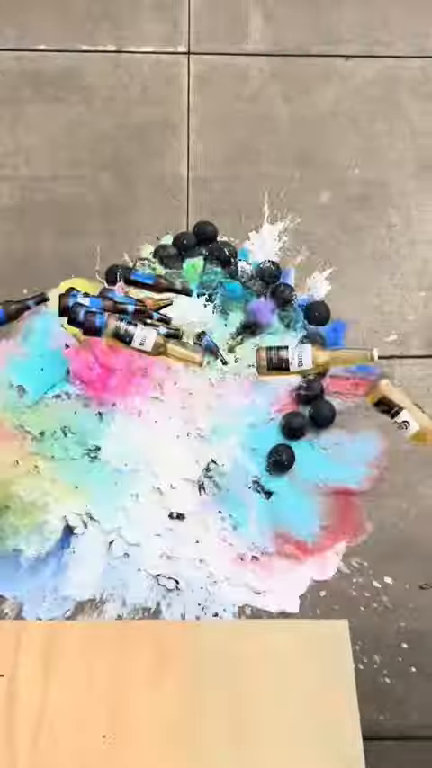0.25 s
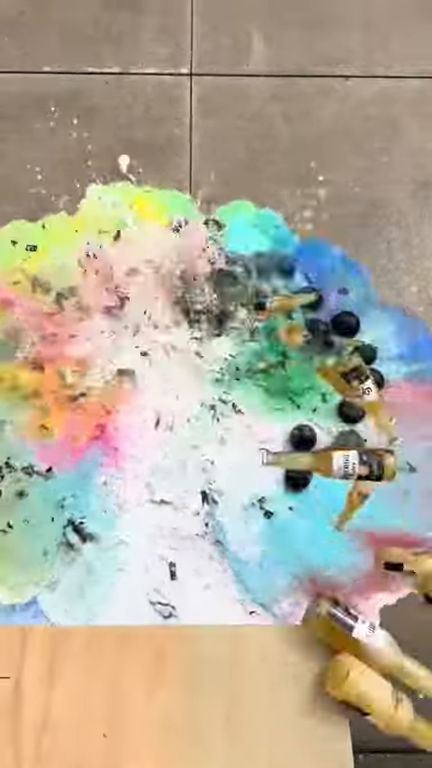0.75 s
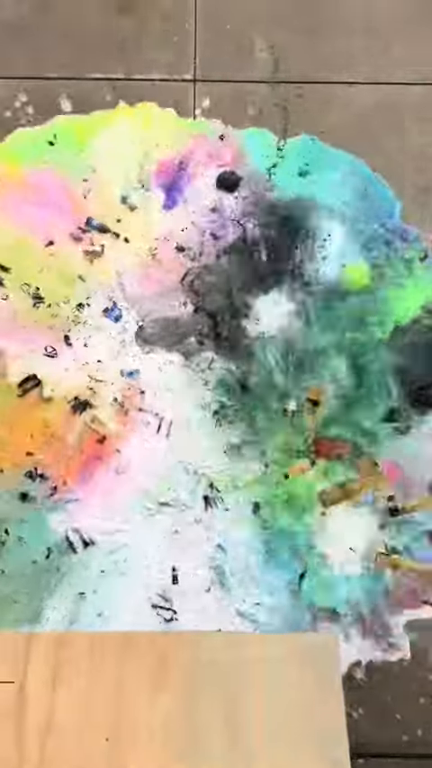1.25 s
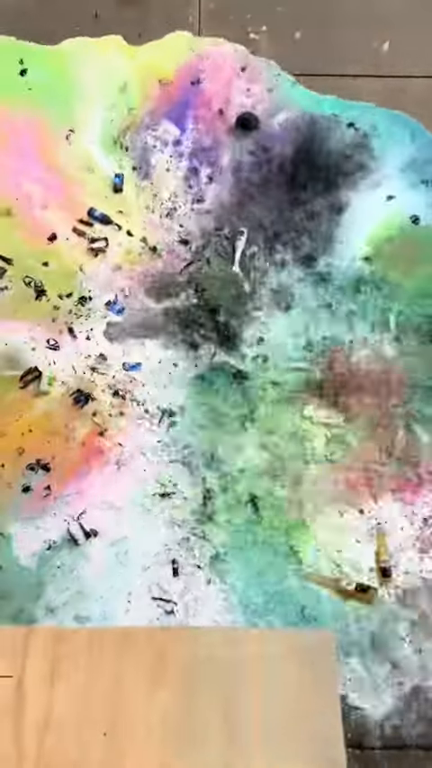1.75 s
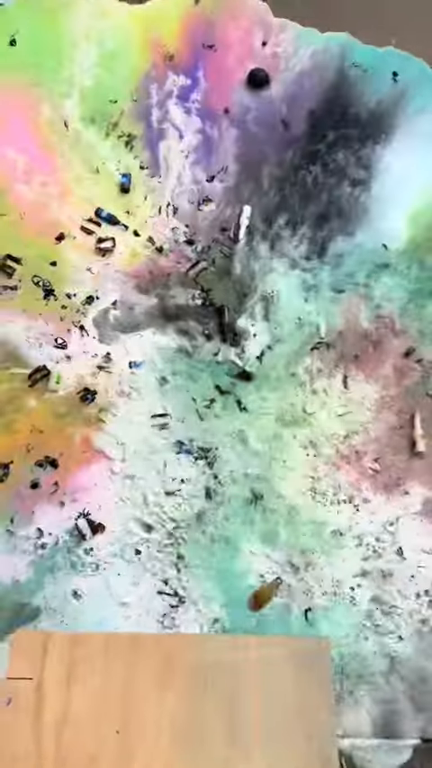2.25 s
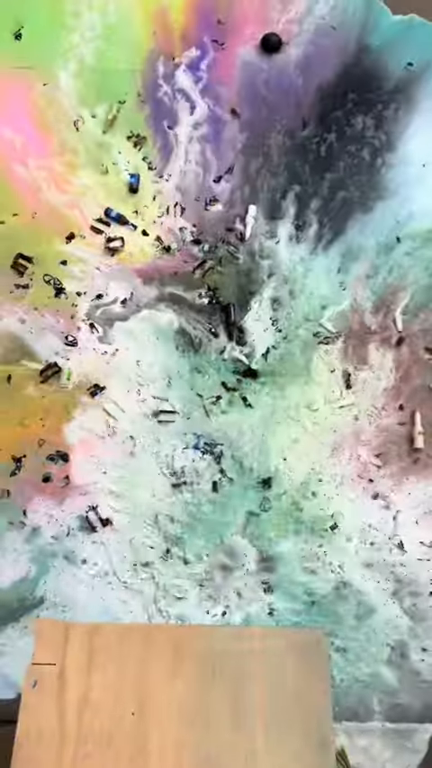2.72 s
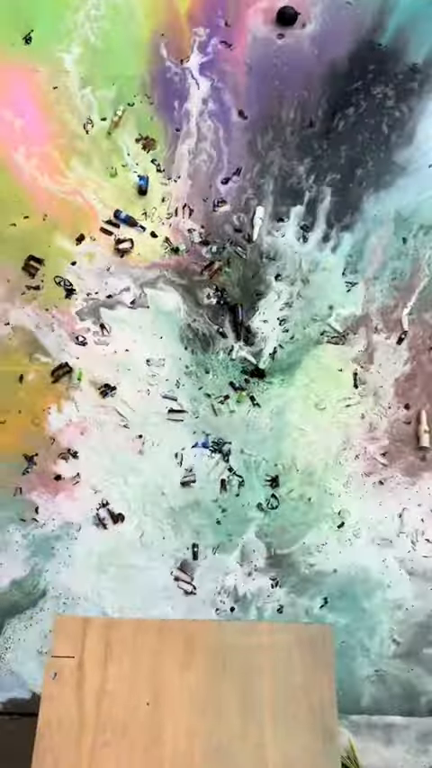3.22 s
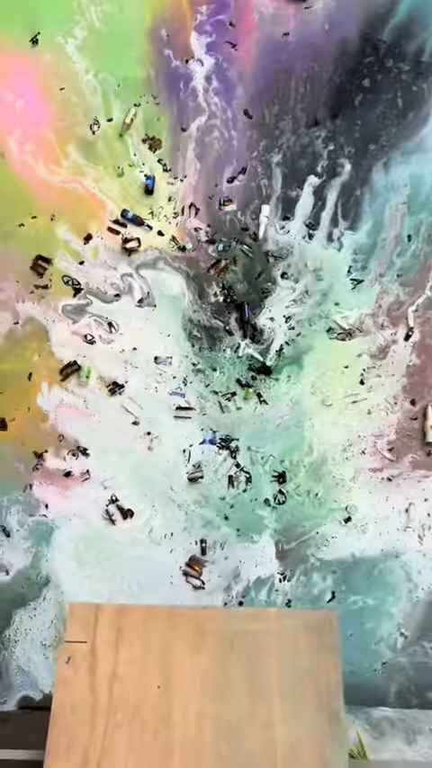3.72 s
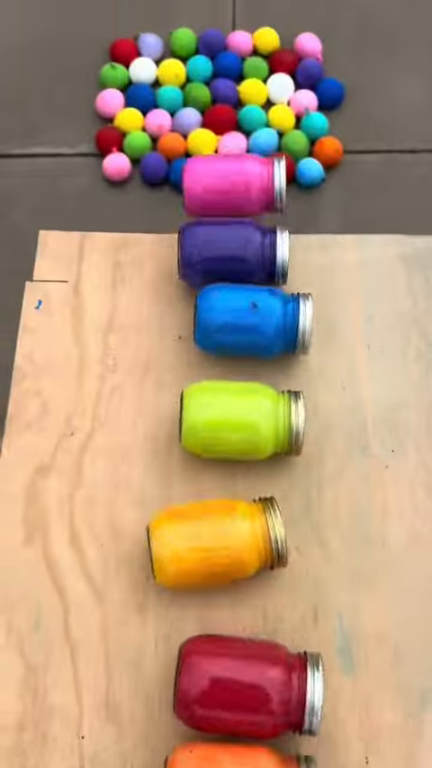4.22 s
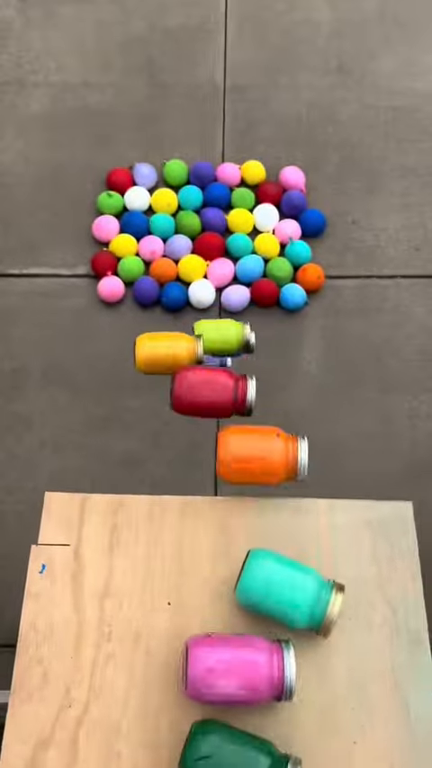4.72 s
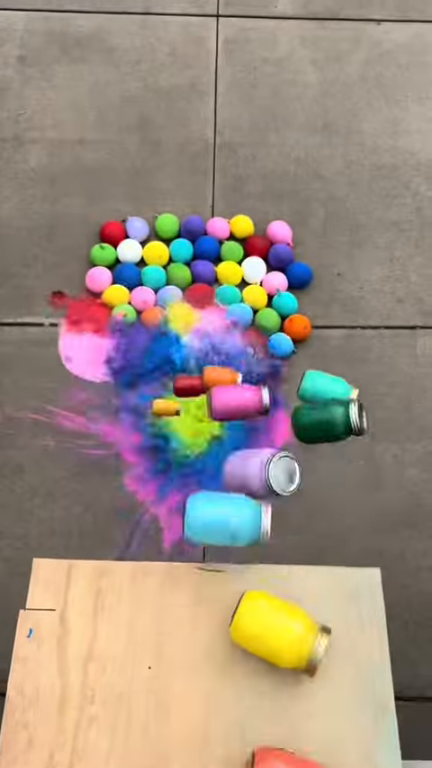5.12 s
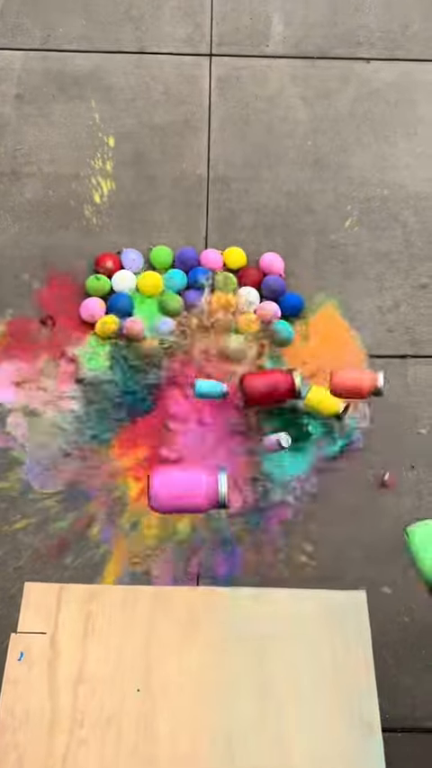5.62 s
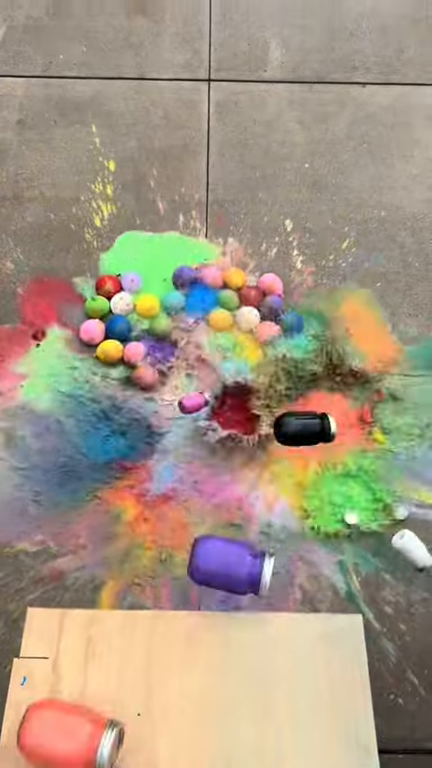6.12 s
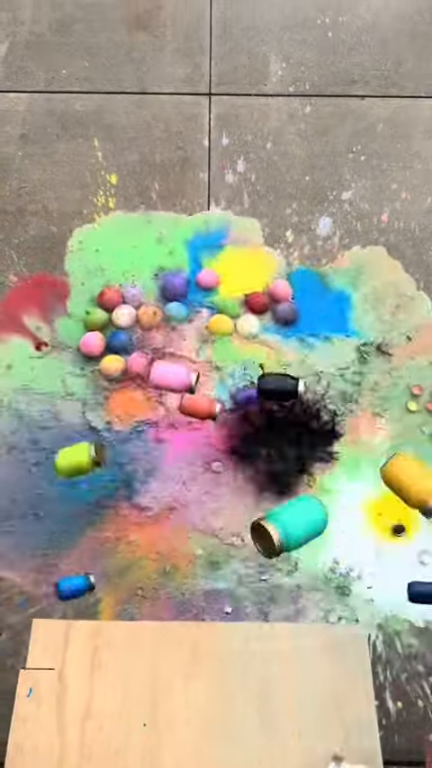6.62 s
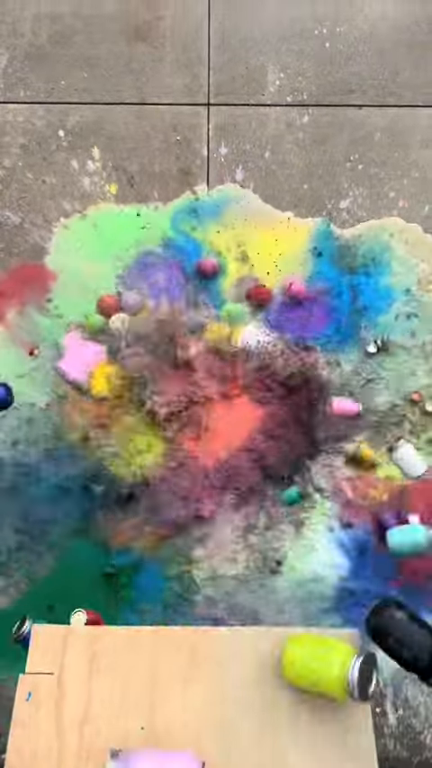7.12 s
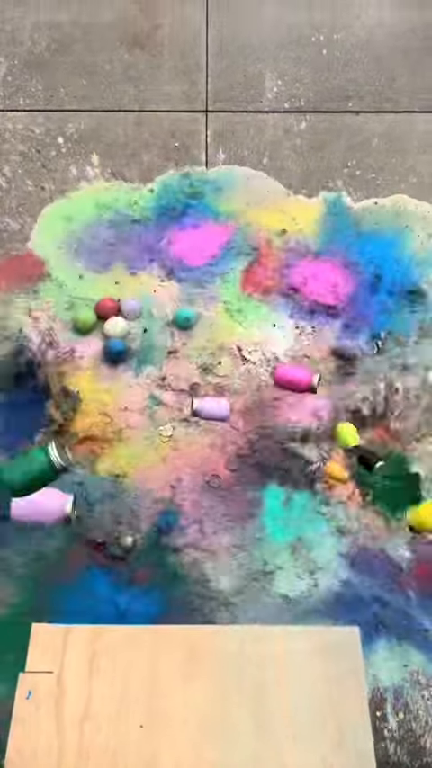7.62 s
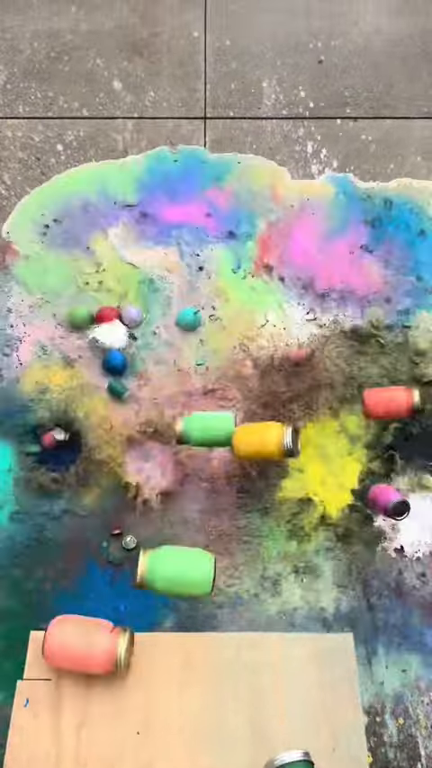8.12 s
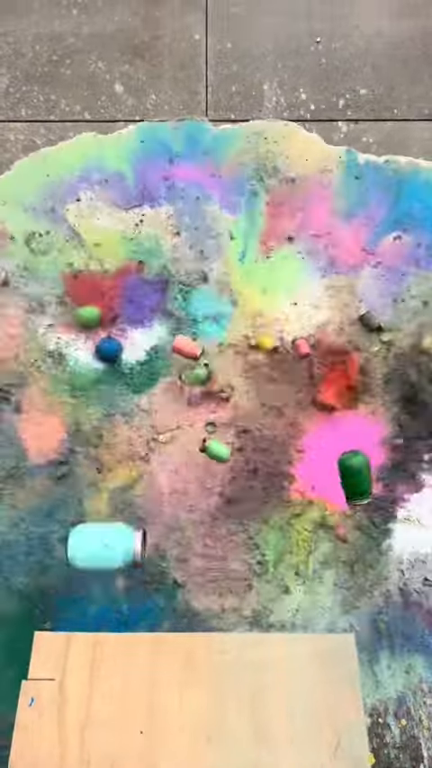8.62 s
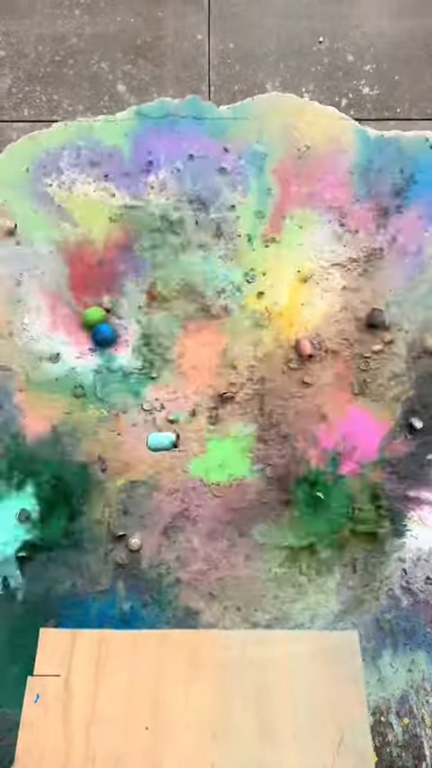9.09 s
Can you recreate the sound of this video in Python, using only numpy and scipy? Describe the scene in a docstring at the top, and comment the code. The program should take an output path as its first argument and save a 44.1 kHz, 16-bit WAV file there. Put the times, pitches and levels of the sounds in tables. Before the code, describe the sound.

A dense volley of dark, thick glass breaking on concrete, mixed with low bursting thumps and liquid spray, pauses briefly, resumes, then settles into delicate ticks. Suddenly the sound changes to hollow wooden knocking and rolling as full jars descend plywood, followed by steady sharp shatters, pops and skittering debris. The microphone is near in an open yard, with short scattered echoes and faint outdoor air; the loudest hits clip softly.

```python
"""Filled bottles, then jars, burst on concrete among water balloons after rolling down a plywood board.
Each landing is a short glass crack and a spray of shards; falling sine sweeps are the low pops of
bursting vessels and, among the jars, probably of some board knocks. Rolling bumps and knocks ring the
board's modes; full jars clink on it without breaking. Shards tick, chime and settle in a bed of shaped
noise, with yard echoes and quiet outdoor air behind. A cut joins the two drops."""
import sys
import numpy as np
from scipy import signal
from scipy.fft import rfft, irfft, next_fast_len
from scipy.io import wavfile
from scipy.ndimage import uniform_filter1d

SR = 44100
rng = np.random.default_rng(int(sys.argv[2]) if len(sys.argv) > 2 else 0)


def put_to_file(sound):
    """Save the sound as 16-bit audio at rate SR, in the file named by the first command-line argument."""
    columns = np.atleast_2d(sound).T  # one column per channel
    safe = np.clip(columns, -1, 1)
    whole_steps = np.round(safe * 32767)
    wavfile.write(sys.argv[1], SR, whole_steps.astype(np.int16))


def invert_db(x):
    """Field ratio 10**(x/20) for x, a level in decibels (scalar or array-like)."""
    u = np.asarray(x, float) / 20
    return 10 ** u


N = 412335
CUT_S = 3.812  # bottles before, jars after

# Glass landing on concrete and breaking.
# Each row: start in seconds, crack level in dB, ring pitch in Hz, shatter level in dB.
LANDINGS = [(0.0208, -8, 1970, -24), (0.0801, -15.5, 1330, -29.5), (0.091, -7, 1250, -36),
            (0.118, -12.5, 1290, -31.5), (0.159, -16, 1800, -34.5), (0.17, -12, 1350, -36),
            (0.187, -16, 2900, -37), (0.2224, -12.5, 1170, -35.5), (0.2464, -11, 1300, -32),
            (0.2675, -12, 1740, -41), (0.28, -9, 1100, -39), (0.313, -14, 1147, -26.5),
            (0.3387, -16, 1480, -24.5), (0.3827, -17, 1590, -33), (0.402, -21, 1560, -24),
            (0.447, -21, 2170, -29), (0.488, -12.5, 1396, -27.5), (0.5157, -32, 1790, -23.5),
            (0.5367, -21, 1800, -31), (0.57, -15, 2220, -27.5), (0.582, -16, 1150, -41.5),
            (0.626, -18, 1540, -26), (0.643, -20, 2950, -34), (0.66, -10, 4800, -28),
            (0.689, -20, 2500, -25.5), (0.7179, -9, 970, -25), (0.7347, -10, 1180, -40),
            (0.7768, -23, 1090, -31), (0.7975, -8, 2420, -36), (1.007, -9.5, 1610, -39),
            (1.037, -12.5, 1240, -44), (1.086, -26, 2510, -29.5), (1.12, -12, 1830, -29),
            (1.1442, -12, 1640, -38.5), (1.1493, -10, 2680, -31.5), (1.167, -24, 1235, -24),
            (1.193, -12.5, 2020, -32.5), (1.2181, -10.5, 1630, -28), (1.2882, -12.5, 1520, -43.5),
            (1.3014, -9.5, 930, -34.5), (1.331, -18.5, 1555, -26), (1.3413, -13, 2120, -46),
            (1.4052, -2.5, 1650, -35.5), (1.4143, -11.5, 970, -28.5), (1.4553, -10, 1920, -35.5),
            (1.48, -11, 1070, -25), (1.488, -8, 2600, -37), (1.5061, -7, 2460, -27),
            (1.518, -3.5, 980, -29), (1.546, -10.5, 1000, -34), (1.88, -11, 5470, -36),
            (1.9784, -27, 1820, -27), (2.4823, -5.5, 1700, -34.5), (2.4994, -24, 2620, -30.5),
            (4.8388, -27, 2980, -26), (4.926, -27, 1150, -25), (4.9827, -13.5, 1244, -45),
            (4.998, -8.5, 2360, -22.5), (5.0836, -13, 2420, -24.5), (5.1681, -9.5, 3010, -23.5),
            (5.2803, -5.5, 2464, -31.5), (5.3412, -10.5, 3030, -27.5), (5.5066, -15, 1626, -23),
            (5.5311, -12, 2020, -27.5), (5.6011, -9.5, 2180, -27), (5.6916, -22, 1590, -26),
            (5.754, -7.5, 2640, -26.5), (5.863, -9, 3640, -25), (5.9726, -13, 2020, -26.5),
            (6.077, -10, 2820, -26), (6.187, -21, 1140, -51), (6.2012, -10, 1730, -28),
            (6.3103, -18.5, 1700, -23.5), (6.528, -12, 1560, -27.5), (6.5942, -13.5, 2450, -26.5),
            (6.6688, -15.5, 2200, -30), (6.76, -10.5, 2220, -24), (6.8666, -20, 2420, -25.5),
            (6.8927, -14.5, 1950, -25.5), (6.938, -15, 2520, -25.5), (6.947, -20.5, 1290, -26),
            (7.074, -11, 990, -43), (7.0856, -8.5, 1188, -30), (7.1135, -15, 1770, -33),
            (7.1747, -20.5, 5000, -27.5), (7.241, -12.5, 1420, -29.5), (7.273, -13, 2500, -31.5),
            (7.358, -16, 1580, -28.5), (7.418, -12, 1390, -23.5), (7.479, -10, 2380, -27),
            (7.5743, -4.5, 2570, -32), (7.6245, -14, 5000, -29), (7.7034, -17, 1730, -25),
            (7.7428, -14, 4000, -30), (7.771, -17, 2470, -25), (7.799, -11, 3020, -27),
            (7.8535, -16, 1440, -28), (7.911, -12, 1020, -44.5), (7.97, -18, 2600, -26),
            (8.061, -4, 2400, -27.5), (8.08, -18, 1450, -21.5), (8.3866, -12, 1560, -27.5),
            (8.539, -10, 1170, -27), (8.589, -17, 2560, -32), (8.6282, -15.5, 2440, -27.5),
            (8.7283, -14, 2570, -31), (8.775, -8.5, 2770, -28.5), (8.95, -16.5, 2350, -25.5),
            (8.977, -11.5, 1910, -31), (8.9992, -18, 2550, -28), (9.213, -18, 2860, -27.5)]
# Glass rolling on the board. Each row: time in seconds, level in dB, left minus right in dB.
ROLLING = [(0, -13.5, -4.5), (.3, -19, -3.5), (.75, -40.5, -5), (1.5, -33.5, -1), (2.2, -63, -5),
           (3.81, -89, 7), (3.814, -21, -1), (3.9, -12.5, -3), (4.3, -11.5, -2.5), (5.0, -15, -3),
           (5.8, -18, -5.5), (7.5, -22.5, -6), (8.0, -19.5, -3), (8.2, -33.5, -2), (8.55, -33.5, -5),
           (8.75, -54, -2), (9.35, -44, -4.5)]
# Stereo likeness of board and air. Each row: frequency in Hz, left-right likeness from 0 to 1.
WIDE_SAME = [(60, 1), (180, 1), (550, 0.57), (1650, 0.58), (4970, 0.37), (15000, 0.18)]


def evened(x):
    """Scales to rms 1."""
    return x / np.sqrt(np.mean(x ** 2) + 1e-20)


def read(points, hz):
    """Reads a spectrum on a log-frequency axis."""
    f, value = np.transpose(points)
    return np.interp(np.log(hz + 1), np.log(f + 1), value)


def column(rows, index):
    """One column of timed rows, interpolated to every sample."""
    return np.interp(np.arange(N) / SR, np.transpose(rows)[0], np.transpose(rows)[index])


def add(mix, s, sound):
    """Mixes a sound in at s seconds; what began before the cut ends there."""
    end = round(CUT_S * SR) if s < CUT_S else N
    part = mix[..., round(s * SR):end][..., :sound.shape[-1]]
    part += sound[..., :part.shape[-1]]


def band(x, lo_hz, hi_hz):
    """Band-pass."""
    return signal.sosfilt(signal.butter(2, [lo_hz, min(hi_hz, SR / 2.1)], "band", fs=SR, output="sos"), x)


def coloured(x, spectrum):
    """Filters by a spectrum in dB."""
    size = next_fast_len(N)
    gain = invert_db(read(spectrum, np.fft.rfftfreq(size, 1 / SR)))
    return irfft(rfft(x, size) * gain, size)[..., :N]


def pair(a, b, same):
    """Left and right from two unrelated sounds: a is the middle, b the side, weighed by frequency."""
    size = next_fast_len(N)
    a, b = rfft(a, size), rfft(b, size)
    c = np.clip(read(same, np.fft.rfftfreq(size, 1 / SR)), 0, 1)
    lean = np.sqrt((1 - c) / (1 + c))  # side over mid
    return irfft(np.array([a + lean * b, a - lean * b]), size)[:, :N]


def clicks(per_s, spread_db, count):
    """Sparse clicks of random sign, a few of them large."""
    size = invert_db(spread_db * np.minimum(rng.exponential(1, (count, N)), 4))
    return size * rng.choice([-1., 1.], (count, N)) * (rng.random((count, N)) < per_s / SR)


def clatter(bumps, t60):
    """Noise whose level jumps at each bump and dies away."""
    jumps = signal.lfilter([1], [1, -invert_db(-60 / (t60 * SR))], abs(bumps))
    return evened(jumps * rng.standard_normal(bumps.shape))


def ring(t, hz, t60):
    """A dying mode: a sine that loses 60 dB in t60 seconds."""
    return invert_db(-60 * t / t60) * np.sin(2 * np.pi * hz * t)


def pieces(t, u, within_s=0.045, lo_hz=900, octaves=2.4, ring_t60=0.012, spread_db=14):
    """Broken pieces strike the slab, crowded toward the start, each ringing briefly at its own pitch."""
    late = np.maximum(t - within_s * u[:, :1] ** 3.3 - 0.003, 0)
    level = invert_db(-spread_db * u[:, 1:2])
    hz = lo_hz * 2 ** (octaves * u[:, 2:3])
    return (level * ring(late, hz, ring_t60 * (0.13 + u[:, 3:]))).sum(axis=0)


def cracks(rows, top_hz=6760, spray_t60=0.095, treble_spray_db=-4):
    """A brief ring with two neighbours, a snap around the same pitch, then shards spray out."""
    # rows: start in seconds, level in dB, ring Hz, then treble and spray in dB relative to that level
    ring_t60, snap_t60, peak_s = 0.012, 0.016, 0.001791
    edge_db, pieces_db, reach = -9, 5.5, 2.5  # reach: snap band edges as a pitch ratio
    out, t = np.zeros((2, N)), np.arange(6000) / SR
    noise, chance = rng.standard_normal((len(rows), 3, len(t))), rng.random((len(rows), 2))
    bits = rng.random((len(rows), 9, 4))  # nine pieces a landing
    clumps = invert_db(4 * evened(band(noise[:, 2], 40, 250)))  # the spray comes in clumps
    mids, highs = band(noise, 330, top_hz), band(noise, 2500, 13000)
    late = t - peak_s  # the contact builds up and peaks a moment after first touch, all pitches in step
    after = np.maximum(late, 0)
    snap_shape = np.minimum(t / peak_s, 1) ** 2 * invert_db(-60 * after / snap_t60)
    spray_shape = invert_db(-60 * t / spray_t60) * np.minimum(t / 0.0034, 1)
    for row, mid, high, u, bit, clump in zip(rows, mids, highs, chance, bits, clumps):
        s, db, hz, treble_db, spray_db = row
        body = ring(after, hz, ring_t60)
        body += 1.19 * ring(after, hz * (0.61 + 0.4 * u[0]), ring_t60)
        body += 0.28 * ring(after, hz * (0.5 + 0.96 * u[1]), ring_t60)
        edge = invert_db(edge_db) * evened(band(mid[0], hz / reach, hz * reach))
        snap = snap_shape * (edge + invert_db(treble_db) * evened(high[0]))
        click = np.cos(2 * np.pi * hz * late) * np.exp(-(late * hz / 0.76) ** 2)
        tip = np.cos(2 * np.pi * 10500 * late) * np.exp(-(late / 0.00007) ** 2)
        click += invert_db(treble_db - 9.5) * tip
        wide = 1.094 * evened(mid[1] + 0.097 * mid[[2]] * [[1], [-1]])
        wide = wide + invert_db(pieces_db) * pieces(t, bit) + invert_db(treble_spray_db) * evened(high[1:])
        spray = invert_db(spray_db) * spray_shape * clump * wide
        add(out, s, invert_db(db) * (0.2 * body + click + snap + spray))
    return out


def bottles_and_jars():
    """Breaking landings: thick bottle glass breaks darker than the jars, with more snap and spray."""
    def drop(rows, snap_db, spray_db):  # both relative to the shatter level
        return [(s, db, hz, shatter_db + snap_db - db, shatter_db + spray_db - db)
                for s, db, hz, shatter_db in rows]
    bottles = drop([row for row in LANDINGS if row[0] < CUT_S], snap_db=2.5, spray_db=5.5)
    jars = drop([row for row in LANDINGS if row[0] > CUT_S], snap_db=0.5, spray_db=1)
    return cracks(bottles, top_hz=3070, treble_spray_db=-6.5) + cracks(jars)


def pops():
    """A low thump's pitch sweeps down fast, sags on and fades, leaving a dull thud."""
    # Low thumps with falling pitch: vessels bursting and, among the jars, probably some board knocks.
    # Each row: time in seconds, level in dB, base pitch in Hz.
    thumps = [(0.026, -5, 301.7), (0.049, -15.5, 325), (0.083, -5.5, 330), (0.123, -3.5, 369),
              (0.152, -7, 307), (0.174, -15, 515), (0.221, -9, 324), (0.229, -3.5, 300),
              (0.271, -22.5, 383), (0.321, -9, 497), (0.346, -9.5, 233), (0.4, -8, 414), (0.488, -7, 308),
              (0.517, -10, 274), (0.577, -11.5, 262), (0.588, -9.5, 275), (0.631, -11, 231),
              (0.67, -7.5, 282), (0.717, -6, 414), (0.734, -7, 295), (0.783, -6.5, 338), (0.801, -4, 458),
              (1.005, -19.5, 478), (1.034, -25, 590), (1.085, -9, 341), (1.128, -8, 370),
              (1.147, -7.5, 339), (1.172, -9, 634), (1.195, -8.5, 308), (1.219, -14, 333),
              (1.3, -10.5, 336), (1.331, -10, 322), (1.343, -13, 346), (1.416, -5.5, 322), (1.48, -6, 322),
              (1.508, -5.5, 276), (1.516, -17.5, 334), (1.542, -9.5, 365), (1.881, -12.5, 314),
              (1.982, -12, 320), (2.484, -8.5, 354), (4.87, -6.5, 302), (4.985, -8.5, 245),
              (5.104, -7, 300), (5.206, -4, 398), (5.542, -14, 403), (5.886, -4, 317), (6.604, -9.5, 260),
              (6.88, -15, 227), (7.091, -12.5, 244), (7.117, -7.5, 354), (7.154, -14, 348),
              (7.597, -30, 231), (7.682, -16, 272), (7.713, -8, 332), (7.805, -7, 347), (7.875, -12, 252),
              (7.906, -9, 328), (7.982, -7.5, 375), (8.004, -15, 332), (8.08, -10, 364), (8.177, -21, 300),
              (8.261, -20.5, 302), (8.35, -16, 327), (8.389, -16.5, 229), (8.448, -16.5, 346),
              (8.483, -18.5, 352), (8.527, -25, 228), (8.59, -28, 242), (8.63, -25.5, 396),
              (8.727, -25, 233), (8.777, -30, 296), (8.953, -29, 255), (9.003, -23.5, 231),
              (9.216, -34, 217)]
    bottle_start, jar_start, fall_s = 3.2, 2.2, 0.001834  # starts: rise above base pitch, as a ratio
    sag, sag_s = 0.21, 0.0034  # the pitch settles this share below its base
    lead_s, turn, cycles, thud_db = 0.0011, 0.072, 2.3, -14  # begins ahead of its time; start phase in turns
    out, t = np.zeros(N), np.arange(6000) / SR
    thuds = band(rng.standard_normal((len(thumps), len(t))), 68, 390)
    thuds = thuds * invert_db(-60 * t / 0.13) * np.minimum(t / 0.013, 1)
    for (s, db, hz), thud in zip(thumps, thuds):
        start = jar_start if s > CUT_S else bottle_start
        pitch = hz * (1 - sag * (1 - np.exp(-t / sag_s)) + start * np.exp(-t / fall_s))
        turns = np.cumsum(pitch) / SR
        shape = np.minimum(t / 0.0047, 1) * invert_db(-14 * np.maximum(t * hz - cycles, 0))  # 14 dB a cycle
        pop = shape * np.sin(2 * np.pi * (turns + turn)) + invert_db(thud_db) * thud / abs(thud).max()
        add(out, max(s - lead_s, 0), invert_db(db) * pop)
    return out


def board():
    """Bumps of rolling glass and single knocks ring the plywood's modes; each knock finds another spot."""
    # Jar shoulders knocking the board. Each row: start in seconds, thump level in dB, clack level in dB.
    knocks = [(3.822, -3.5, -48), (3.85, -4.5, -46), (3.875, -6.5, -43), (3.917, -21, -44),
              (3.938, -5, -40), (3.963, -9, -24), (3.995, -1, -27), (4.036, -9.5, -25), (4.084, -2, -19),
              (4.128, 1, -22), (4.15, 0, -27), (4.17, 1, -19.5), (4.211, -4, -11.5), (4.233, -1, -22),
              (4.247, -0.5, -31), (4.26, -5.5, -37), (4.284, -11, -18), (4.304, 1, -15.5),
              (4.334, -0.5, -24), (4.374, -28, -20.5), (4.407, -11, -31), (4.441, -3.5, -37),
              (4.462, -3.5, -17.5), (4.496, -5, -16), (4.529, -4, -22), (4.558, 0.5, -25),
              (4.589, -1.5, -23), (4.62, -0.5, -17.5), (4.659, -9.5, -17), (4.677, -3, -31),
              (4.774, -0.5, -13.5), (4.801, -19, -27), (5.252, -11, -23), (5.306, -8, -21),
              (5.538, -12, -30), (5.669, -14, -20), (5.706, -17, -33), (5.803, -16, -31),
              (5.977, -12.5, -35), (6.055, -14.5, -25), (6.083, -14, -36), (6.229, -15, -26),
              (6.275, -8.5, -31), (6.329, -7.5, -15), (6.496, -9.5, -27), (6.672, -15.5, -17),
              (6.759, -17, -28), (6.868, -12.5, -30), (6.922, -16.5, -30), (7.306, -29, -43),
              (7.358, -14.5, -24), (7.486, -9, -20)]
    # Plywood modes. Each row: frequency in Hz, damping width in Hz, level in dB ahead of the width's root.
    plywood = [(95.5, 12, -12.5), (166.3, 91, -2.5), (231, 26, 0), (332.7, 81, -0.5), (370, 69, 0.5),
               (486, 130, -2), (843, 138, -10.5), (970, 41, -17.5), (1800, 210, -27.5)]
    # Broad clatter of the board. Each row: frequency in Hz, filter gain in dB.
    skirt = [(29, -54), (50, -2), (229, -9), (386, -2.5), (576, 2.5), (690, -12), (5320, -68), (6000, -76),
             (7800, -99), (13200, -120)]
    bumps_per_s, bump_spread_db, skirt_db = 85, 2, -13
    contact_s, spread_s, thump_hz = 0.001, 0.00395, 120
    t, count = np.arange(4000) / SR, len(plywood)
    bumps = clicks(bumps_per_s, bump_spread_db, count=2 * count)
    bumps += 2.2 * bumps[:1].repeat(2 * count, axis=0)  # the strongest bumps reach all modes at once
    modes = []
    for hz, width, db in plywood:
        arrived = np.maximum(t - spread_s * max(np.sqrt(1000 / hz) - 1, 0), 0)  # low bending waves lag
        soft = np.minimum(arrived / contact_s, 1)  # round glass lands softly
        modes.append(invert_db(db) * ring(arrived, hz, 3.1 / width) * np.sqrt(width) * soft)
    modes = np.array(modes)
    rung = signal.oaconvolve(bumps.reshape(2, -1, N), modes[None], axes=2)[..., :N].sum(axis=1)
    rung = evened(rung) + invert_db(skirt_db) * evened(coloured(clatter(bumps[::count], 0.06), skirt))
    level_db, pan_db = column(ROLLING, index=1), column(ROLLING, index=2)
    both = evened(pair(*rung, WIDE_SAME))
    bass = signal.sosfilt(signal.butter(1, 90, fs=SR, output="sos"), both)  # the bass is not panned
    out = invert_db(level_db) * (bass + (both - bass) * invert_db(np.outer([0.5, -0.5], pan_db)))
    raps = band(rng.standard_normal((len(knocks), len(t))), 430, 1580)
    raps = raps * invert_db(-60 * t / 0.045) * np.minimum(t / 0.0015, 1)  # hard first contact
    spots = rng.uniform(0.02, 1, (len(knocks), count))
    for (s, db, clack_db), rap, spot in zip(knocks, raps, spots):
        knock = band(spot @ modes * invert_db(-60 * t / 0.16), thump_hz, 3200)
        knock = invert_db(db) * knock / abs(knock).max() + invert_db(clack_db) * rap / abs(rap).max()
        add(out, s, knock * invert_db(np.array([[0.5], [-0.5]]) * pan_db[round(s * SR)]))
    return out


def clinks():
    """Full jars clink together without breaking: cracks with a short rattle in place of the spray."""
    # Each row: start in seconds, level in dB, ring pitch in Hz.
    touches = [(4.0136, -3, 2930), (4.193, -13.5, 2830), (4.209, -35, 1800), (4.3816, -9.5, 2630),
               (4.4913, -14.5, 1390), (4.7636, -12.5, 1240), (4.7926, -21, 1160)]
    treble_db, rattle_db = -27.5, -18  # relative to each clink
    return cracks([(s, db, hz, treble_db, rattle_db) for s, db, hz in touches], spray_t60=0.026)


def tinkles():
    """Single shards drop with a sharp tick and a short ring; some ring unsteadily while they rock."""
    # Settling shards. Each row: start in seconds, level in dB, ring pitch in Hz.
    drops = [(1.649, -24.5, 5260), (1.7214, -33, 2450), (1.7577, -22, 4930), (1.779, -23.5, 4940),
             (2.1585, -32.5, 4020), (2.1997, -28, 4130), (2.2742, -31.5, 5330), (2.356, -42, 3300),
             (2.583, -32, 1610), (2.6144, -31.5, 5040), (2.763, -36.5, 3970), (2.786, -32, 1560),
             (2.8044, -35, 1465), (2.846, -32.5, 4630), (2.9346, -32, 5700), (3.088, -38, 2840),
             (3.1527, -37.5, 4140), (3.3487, -44.5, 5260), (7.719, -18.5, 3010), (8.05, -31, 4480),
             (8.1176, -23, 2420), (8.9148, -24.5, 2900)]
    # Shards that rock, then lie flat. Each row: start in seconds, level in dB, pitch in Hz,
    # length in seconds ahead of the final fade.
    rocking = [(1.649, -38, 5090, .03), (1.759, -34, 5080, .03), (2.018, -39, 5120, .045),
               (2.04, -38, 4250, .09), (2.36, -39, 3850, .022), (2.438, -43, 5300, .018),
               (2.852, -47, 4720, .018), (3.099, -45, 3480, .022), (5.869, -24, 4950, .018),
               (8.708, -30, 1114, .025), (9.138, -36, 4820, .028)]
    tick_t60, ring_t60, hiss_t60, hiss_db = 0.018, 0.011, 0.059, -18
    out, t = np.zeros(N), np.arange(9000) / SR
    tick_shape = invert_db(-60 * t / tick_t60) + invert_db(hiss_db - 60 * t / hiss_t60)
    ticks = band(rng.standard_normal((len(drops), len(t))), 1300, 15000)
    for (s, db, hz), tick in zip(drops, ticks):
        add(out, s, invert_db(db) * (0.87 * ring(t, hz, ring_t60) + tick * tick_shape))
    rocks = band(rng.standard_normal((len(rocking), len(t))), 30, 170)
    for (s, db, hz, length), rock in zip(rocking, rocks):
        shape = np.clip(np.minimum(t / 0.0023, (length - t) / 0.0055 + 1), 0, 1)
        add(out, s, invert_db(db) * ring(t, hz, 6 * length) * shape * (1 + 0.33 * evened(rock)))
    return out


def splash():
    """Each landing throws liquid that rains down and settles; amplitude over time."""
    splash_db, splash_t60 = -10, 0.43  # level relative to the shatter
    power, t = np.zeros(N), np.arange(2 * SR) / SR
    for s, _, _, shatter_db in LANDINGS:
        add(power, s, invert_db(shatter_db + splash_db - 60 * t / splash_t60) ** 2)
    return np.sqrt(power)


def debris():
    """Dense ticks and splash hiss, small shards that chime at scattered pitches, liquid sloshing below."""
    # Shards and liquid skittering and settling. Each row: time in seconds, level in dB.
    settling = [(0, -36.5), (.6, -42), (.85, -52), (1.05, -51), (1.3, -38.5), (1.85, -38), (2.45, -48),
                (2.6, -46), (3.0, -52.5), (3.8, -69), (4.8, -80), (4.86, -38.5), (6.4, -41.5), (6.9, -37),
                (8.2, -37.5), (8.8, -44.5), (9.35, -42)]
    # Shard colour. Each row: frequency in Hz, filter gain in dB.
    shard_colour = [(300, -5.5), (600, 14.5), (1750, 15.5), (3200, 6), (5000, -1.5), (7000, -10.5),
                    (16000, -17)]
    # Each row: frequency in Hz, left-right likeness from 0 to 1.
    shard_same = [(60, 0.56), (180, 0.92), (550, 0.87), (1650, 1), (4970, 0.16), (15000, 0.09)]
    ticks_per_s, tick_spread_db, hiss, patchy_db, chimes_db = 300, 2.5, 0.8, 2.5, -14
    body_db, slosh_db = -5.5, 3  # low part relative to settling level; slosh relative to splash and rattle
    rattle_db, grit_db = -27, -50  # low rattle and fine grit under the glass, relative to rolling
    t = np.arange(1500) / SR
    ticks = clatter(clicks(ticks_per_s, tick_spread_db, count=1).repeat(2, axis=0), 0.037)
    z = signal.stft(coloured(ticks + hiss * rng.standard_normal((2, N)), shard_colour), nperseg=256)[2]
    patches = uniform_filter1d(rng.standard_normal(z.shape[1:]), size=5, axis=0)
    patches = uniform_filter1d(patches, size=12, axis=1)
    bed = evened(signal.istft(z * invert_db(patchy_db * evened(patches)), nperseg=256)[1][:, :N])
    chimes = np.zeros(N)
    for u in rng.random((1400, 3)):
        add(chimes, u[0] * N / SR, invert_db(15 * u[1]) * ring(t, 1500 * 3.7 ** u[2], 0.017))
    middle_chimes = invert_db(chimes_db) * evened(chimes) * [[1], [0]]
    both = pair(*(bed + middle_chimes), shard_same)
    low = evened(signal.sosfilt(signal.butter(4, 6000, fs=SR, output="sos"), both))
    high = evened(signal.sosfilt(signal.butter(4, 6000, "high", fs=SR, output="sos"), both))
    slosh = invert_db(slosh_db) * evened(band(rng.standard_normal(N), 35, 200))
    level_db, roll_db = column(settling, index=1), column(ROLLING, index=1)
    wet = splash() + invert_db(roll_db + rattle_db)
    low_part = (invert_db(level_db + body_db) + wet) * low
    high_part = (invert_db(level_db) + invert_db(roll_db + grit_db)) * high
    return low_part + wet * slosh + high_part


def yard(x):
    """Walls nearby return scattered echoes, each band dying at its own speed."""
    # Each row: frequency in Hz, time to fall 60 dB in seconds.
    decay = [(120, 0.27), (330, 0.44), (870, 0.35), (2300, 0.51), (6060, 0.6)]
    first = round(0.01 * SR)
    taps = np.zeros((2, SR // 2))
    at = np.arange(first, SR // 2 - 20, 20)  # one echo at random in every 20 samples
    signs = rng.choice([-1., 1.], (2, len(at)))
    np.put_along_axis(taps, at + rng.integers(0, 20, (2, len(at))), signs, 1)
    taps[1] = 0.76 * taps[0] + 0.75 * taps[1]  # the two sides are partly alike
    hz, t, z = signal.stft(taps, SR, nperseg=256)
    tail = signal.istft(z * invert_db(-60 * t / read(decay, hz)[:, None]), SR, nperseg=256)[1]
    return signal.oaconvolve(x[None], tail / np.linalg.norm(tail[0]), axes=1)[:, :N]


def air():
    """Quiet outdoor background of steady shaped noise."""
    # Each row: frequency in Hz, filter gain in dB.
    air_colour = [(18, -38.5), (30, -9), (66, 2), (240, -11), (437, -18), (4910, -31), (6050, -43),
                  (7090, -32.5), (16000, -64)]
    return invert_db(-58.5) * evened(pair(*coloured(rng.standard_normal((2, N)), air_colour), WIDE_SAME))


def scene():
    """All sources; breaking glass, tinkles and pops also excite the yard's echo."""
    glass, thumps = bottles_and_jars() + tinkles(), pops()
    echo = invert_db(-15.5) * yard(glass.mean(0)) + invert_db(-9.5) * yard(thumps)  # the low pops carry further
    return glass + clinks() + thumps + echo + board() + debris() + air()


def roll_off(x):
    """The treble ends steeply here."""
    return signal.sosfilt(signal.butter(12, 16780, fs=SR, output="sos"), x)


def record(dry):
    """Narrow treble dips, a top roll-off and a bass cut, then a soft overload folding the loudest peaks."""
    # Narrow dips and a roll-off heard in the top octaves. Each row: frequency in Hz, filter gain in dB.
    dips = [(4900, -1.5), (5500, -1), (6000, -15), (6600, -1), (9000, -0.5), (10300, -3.5), (10900, -1.5),
            (11500, -6), (12500, 3.5), (15000, -2), (15900, -18)]
    bass_cut = signal.butter(4, 62, "high", fs=SR, output="sos")
    cut = signal.sosfilt(bass_cut, coloured(dry, dips))
    overloaded = cut / (1 + cut ** 4) ** 0.38
    return roll_off(overloaded)


dry = scene()
out = record(dry)
put_to_file(out)
```